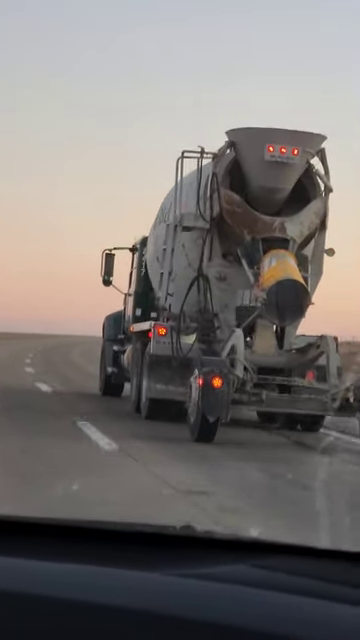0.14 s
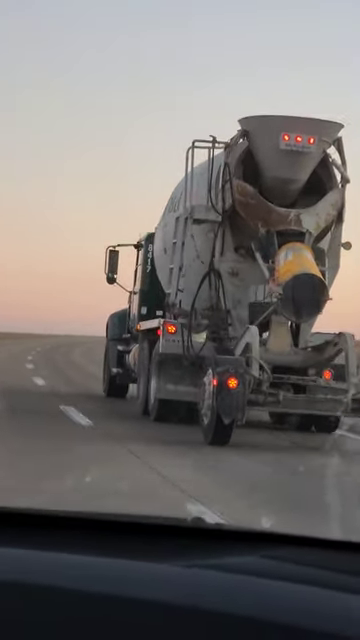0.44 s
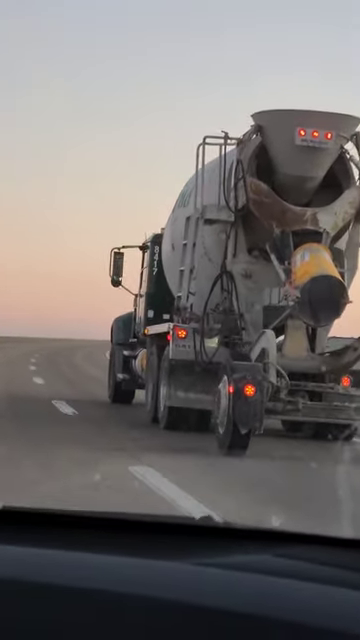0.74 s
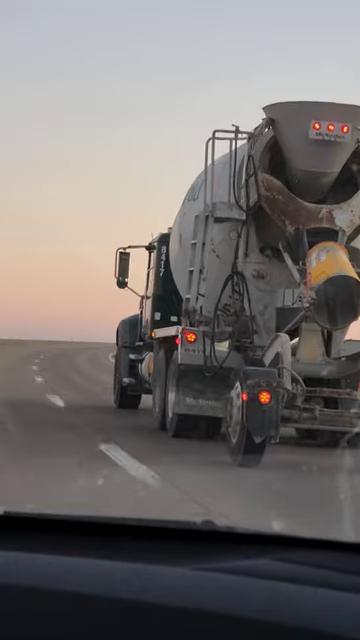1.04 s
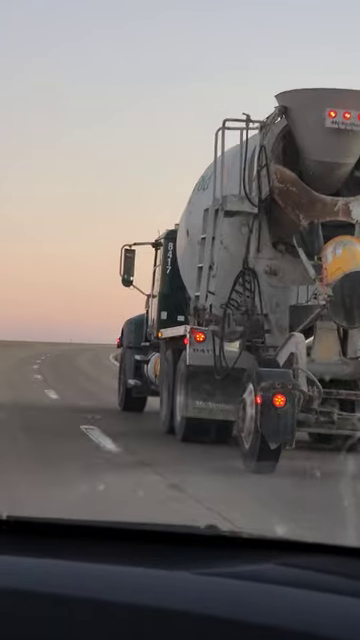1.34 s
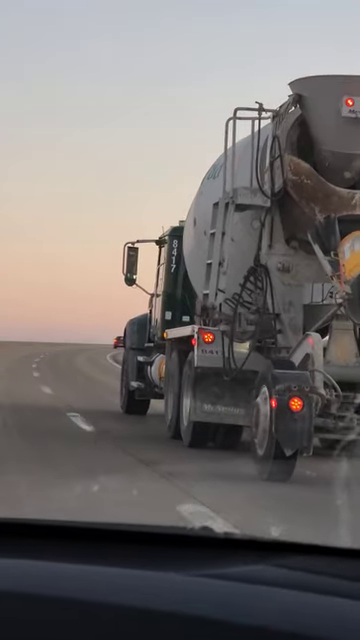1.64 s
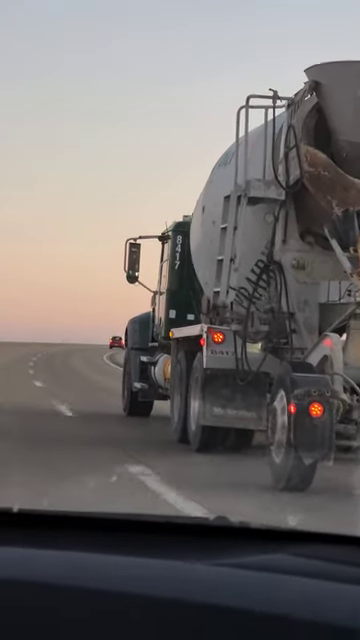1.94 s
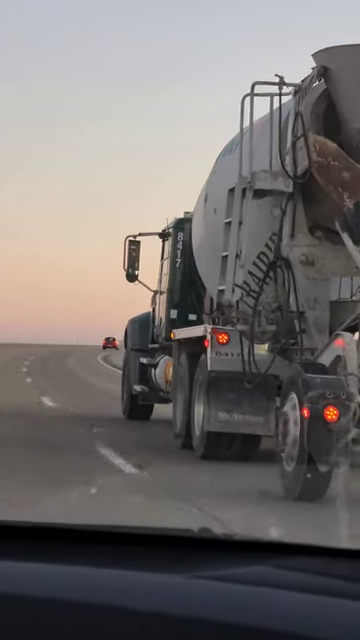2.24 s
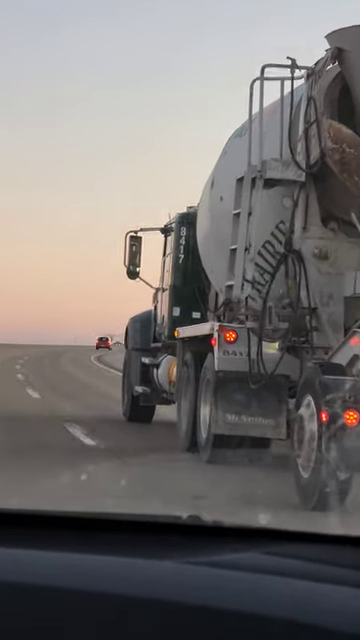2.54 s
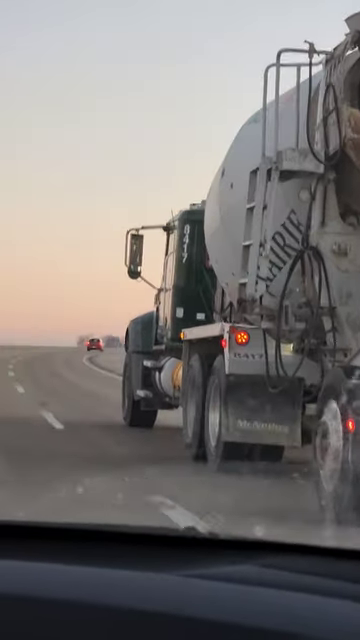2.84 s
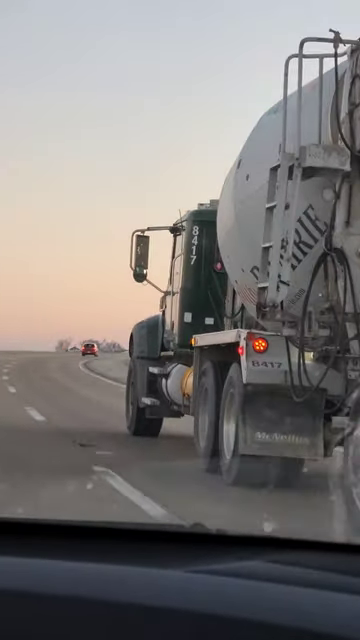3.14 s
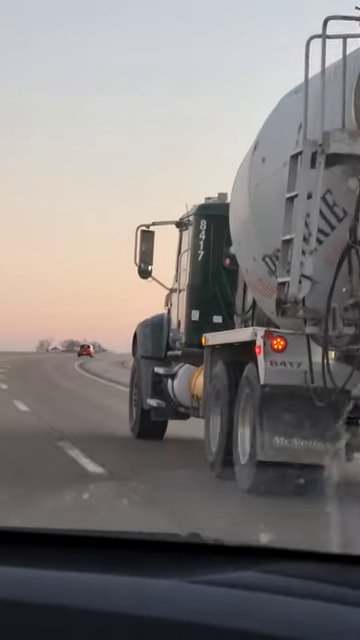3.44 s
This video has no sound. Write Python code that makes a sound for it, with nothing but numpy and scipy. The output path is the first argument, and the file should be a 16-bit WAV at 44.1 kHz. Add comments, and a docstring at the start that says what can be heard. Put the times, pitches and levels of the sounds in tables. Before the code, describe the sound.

Heavy low road rumble surges continuously inside a car at highway speed, with brief bumpy booms, muffled tyre roar, faint engine drone and thin wind; the microphone sits in the cabin.

```python
"""Road rumble fills a car at highway speed: random noise and body resonances, surging in three registers.
Uneven patches of road add booms, made from a low tone with a wandering pitch. Tyres roar and sing in
narrow bands of noise, engines drone faintly as wavering tones, and air rushes past the glass as
shaped noise. A soft hiss swells once and something ticks. A limiter holds down the bass peaks."""
import sys
import numpy as np
from scipy import signal
from scipy.fft import rfft, irfft
from scipy.io import wavfile
from scipy.ndimage import uniform_filter1d, minimum_filter1d

SR = 44100
rng = np.random.default_rng(int(sys.argv[2]) if len(sys.argv) > 2 else 0)


def transcribe(u):
    """Save the signal u as a 16-bit wav file named by the first command-line argument.

    u: samples, shape (n,) or (channels, n), limited to [-1, 1]; the rate is SR.
    q: integer samples, one column per channel.
    """
    v = np.clip(np.atleast_2d(u).T, -1, 1)
    q = np.round(v * 32767).astype(np.int16)
    wavfile.write(sys.argv[1], SR, q)


N = 158319  # length in samples

# Spectrum shapes; only the differences between rows count: (frequency [Hz], density [dB per Hz])
# Air rushing past the glass
AIR_SPECTRUM = [(1500, 1), (3800, -1), (5000, -2.5), (6300, -5.5), (7500, -13.5), (9000, -25), (10500, -25),
                (11700, -18.5), (15000, -24)]
# The soft hiss and the tick
HISS_SPECTRUM = [(3000, -4.5), (6500, 6.5), (8500, -1.5), (10200, -5.5), (11900, 2), (13500, 0.5),
                 (15500, -2.5)]
# Tyre roar through doors and glass
TYRE_SPECTRUM = [(150, -7.5), (400, 3.5), (590, -0.5), (730, -2), (1050, -1), (1200, -2.5), (1450, -0.5),
                 (1580, -7), (1850, -5.5), (2280, -12), (2900, -12.5), (3200, -17), (3700, -18.5),
                 (4100, -23.5), (8000, -56.5)]
# Road rumble in the cabin
RUMBLE_SPECTRUM = [(10, -33), (23, -21.5), (29, 0.5), (45, -3.5), (60, -1), (85, -1), (122, 0), (160, -7.5),
                   (230, -16), (330, -22), (480, -31.5), (800, -45.5), (2000, -66)]

# Level of the hiss, before sway and panning: (time [s], level [dB])
HISS_SWELL = [(1.46, -77), (1.57, -60.5), (1.73, -55.5), (1.89, -55.5), (1.95, -63), (2.15, -74)]
# Level of the tyre roar, before sway: (time [s], level [dB])
TYRE_ROAR_LEVEL = [(0, -30.5), (.8, -29), (2.1, -30.5), (3.6, -29)]

# Swells of single bands, before the depth factor; each band keeps its overall level:
# (time [s], relative level [dB])
# Lower and higher tread noise
LOW_TREAD_SWELL = [(0.0, 2), (0.08, 4.5), (0.28, -7.5), (0.4, -0.5), (0.96, 3), (1.72, -2.0), (1.96, 2),
                   (2.06, 1), (2.44, 3.5), (2.54, -3.0), (2.66, 2.5), (3.22, -1.5), (3.3, 4), (3.5, -2),
                   (3.58, 3)]
HIGH_TREAD_SWELL = [(0.0, 0.0), (0.52, 0), (0.88, 0.5), (1.0, -5), (1.1, 4), (1.381, -2.5), (1.5, 3.5),
                    (1.641, -2.5), (1.84, 3), (1.94, -0.5), (2.821, 0.5), (3.58, 4)]
# Deep, middle and upper rumble, which swell and dip separately
DEEP_SWELL = [(0.0, -1.5), (0.681, 0.0), (0.72, -12), (0.82, -2.5), (1.18, 4), (1.22, -1.5), (1.841, 2.5),
              (1.94, -2), (1.978, 2.0), (2.64, -2), (2.74, 5.5), (2.84, -8), (2.92, 3.0), (3.3, -6),
              (3.32, 0), (3.58, 0)]
MIDDLE_SWELL = [(0.0, 0.5), (0.02, 0.5), (0.26, 1.5), (0.3, -5), (0.46, 2.0), (0.8, -1), (0.84, -0.5),
                (0.979, 4), (1.04, -3.5), (1.08, 4.5), (1.32, -1), (1.358, 1.5), (1.72, 3), (1.88, -4.5),
                (2.08, 3.5), (2.14, -4), (2.28, 1), (2.4, -2.5), (2.46, 2.0), (2.519, -6.5), (2.6, 3),
                (2.92, -1), (2.96, 4), (3.158, -2), (3.22, 6.5), (3.32, -5.0), (3.4, 0), (3.58, 2)]
UPPER_SWELL = [(0.0, -1.5), (0.12, -1.5), (0.18, -5.5), (0.399, -0.5), (0.46, -1), (0.6, 2.0), (0.64, -6),
               (0.72, 3.5), (0.78, -2.5), (0.98, 2.5), (1.54, -0.5), (2.38, 0.5), (2.561, -1.5),
               (2.76, -1.5), (2.8, -4), (3.041, 1.5), (3.141, -3), (3.18, -1), (3.48, 3), (3.58, -1.5)]

# Engine drone tones: (frequency [Hz], level [dB])
ENGINE_TONES = [(101, -29.5), (143, -35), (201, -38)]
# Bands in which the tread sings, before sway and swells:
# (frequency [Hz], width [Hz], level [dB], left-right likeness [-1 to 1])
TREAD_BANDS = [(589, 23, -43.5, 0.49), (915, 59, -45, 0.48), (1044, 24, -46, 0.56), (1113, 17, -44, 0.36),
               (1340, 23, -45.5, 0.43), (1413, 16, -48.5, .3), (1471, 19, -46.5, 0.85),
               (1665, 20, -49, 0.35), (2075, 33, -56, .3), (2593, 35, -54.5, .6), (2800, 70, -59, 0.37),
               (2950, 47, -56.5, 0.54)]
# Resonances of body and cabin air, before sway and swells:
# (frequency [Hz], width [Hz], level [dB], left-right likeness [-1 to 1])
BODY_RESONANCES = [(46.4, 5.9, -18.5, 1), (74.7, 8.5, -22.5, 0.93), (111.4, 17, -21.5, .93),
                   (328, 35, -39, 0.96), (402, 32, -42, 0.68)]
# Uneven patches of road that set the body booming: (start [s], length [s], level [dB])
ROAD_PATCHES = [(0.829, 0.14, -11), (2.031, 0.19, -16), (3.01, 0.072, -11)]

# How alike left and right are: (frequency [Hz], correlation [-1 to 1])
LEFT_RIGHT_LIKENESS = [(30, 0.95), (190, 0.98), (330, 0.65), (550, 0.54), (1050, 0.24), (1250, 0.23),
                       (2100, 0.00033), (2700, 0.5), (3600, 0.26), (4500, -.1), (6000, 0)]
# Left minus right in the cabin: (frequency [Hz], level difference [dB])
CABIN_BALANCE = [(100, -0.7), (450, -0.1), (1000, -1.5), (1600, 0), (2200, 0.9), (3600, .5), (4400, -4),
                 (6100, -5), (7800, 2)]

AIR_DB, RUMBLE_DB = -50.5, -10.5  # before sway
RUMBLE_SWAY_DB = 1.2
HISS_PAN_DB = 2.5  # left minus right
TICK_S, TICK_DB, TICK_ATTACK_S, TICK_DECAY_S = 3.038, -55, .004, .013
ENGINE_DRIFT, TREAD_DRIFT, BODY_DRIFT = .01, .008, .008  # spread of the pitch, as a share
LOW_TREAD_HZ, HIGH_TREAD_HZ = (800, 1230), (1230, 1650)
DEEP_HZ, MIDDLE_HZ, UPPER_HZ = (10, 60), (60, 140), (140, 280)
SURGE_WINDOW_S = 0.076  # averaging window for evening out chance surges
PATCH_HZ, PATCH_WIDTH_HZ, PATCH_ATTACK_S, PATCH_RELEASE_S = 45.6, 12, 0.015, 0.033
CEILING, LIMIT_HOLD_S, LIMIT_BELOW_HZ = .94, .012, 400
TOP_HZ = 15500


def undb(db):
    """Turn decibels into gain."""
    return 10 ** (np.asarray(db) / 20)


def curve(rows):
    """Join the points of a (time, value) table with straight lines."""
    return np.interp(np.arange(N) / SR, *np.array(rows).T)


def bins():
    """Frequency of each spectral line, at least 1 Hz."""
    return np.maximum(np.fft.rfftfreq(N, 1 / SR), 1)


def over_hz(rows):
    """Read a (frequency, value) table on a log-frequency axis."""
    hz, value = np.array(rows).T
    return np.interp(np.log(bins()), np.log(hz), value)


def colour(rows):
    """Gain of a (frequency, dB) table, falling away above its last point."""
    fall = np.maximum(bins() / rows[-1][0], 1) ** 2
    return undb(over_hz(rows)) / fall


def resonance(hz, width_hz):
    """Gain of a resonance: strongest at one frequency, with steep skirts."""
    distance = (bins() ** 2 - hz ** 2) / (bins() * width_hz)
    return 1 / (1 + distance ** 2 / 2)


def below(hz):
    """Gain of a steep low-pass."""
    return 1 / (1 + (bins() / hz) ** 8)


def noise(gain, likeness):
    """Stereo noise of rms 1 with the given spectrum and left-right correlation."""
    c = np.clip(likeness, -1, 1)
    mid, side = rfft(rng.standard_normal((2, N))) * gain
    mid = mid * np.sqrt(1 + c)
    side = side * np.sqrt(1 - c)
    x = irfft(np.array([mid + side, mid - side]), N)
    return x / x.std()


def walk(rate):
    """Smooth random motion with a spread of 1; a higher rate in Hz moves faster."""
    smooth = np.exp(-(bins() / max(rate, 1)) ** 2)
    x = irfft(rfft(rng.standard_normal(N)) * smooth, N)
    return (x - x.mean()) / x.std()


def pan(db):
    """Left and right gains for a left-minus-right level."""
    return undb(np.array([[db], [-db]]) / 2)


def waver(x, share, rate):
    """Let the pitch of a stereo sound wander by reading it a little faster or slower."""
    n = np.arange(N)
    place = n + share * np.cumsum(walk(rate))
    return np.array([np.interp(place % (N - 1), n, side) for side in x])


def ringing(table, sway_db, drift):
    """Resonances shaken at random, each swaying in level and wandering in pitch."""
    out = 0
    for hz, width, db, likeness in table:
        ring = waver(noise(resonance(hz, width), likeness), drift, 5.56)
        out = out + ring * undb(db + sway_db * walk(2.5))
    return out


def swell(x, band_hz, rows, depth, evenness):
    """One band of a noise swells along a level curve; its own chance surges are partly evened out."""
    low, high = band_hz
    band = irfft(rfft(x) * (below(high) - below(low)), N)
    size = int(SURGE_WINDOW_S * SR)
    power = uniform_filter1d(uniform_filter1d((band ** 2).mean(axis=0), size), size)
    evened = band / power ** (np.clip(evenness, 0, 1) / 2)
    shaped = evened * undb(depth * curve(rows))
    return x - band + shaped * band.std() / shaped.std()  # the band keeps its overall level


def hiss():
    """High, thin noise that swells and fades, a little louder on the left."""
    level = undb(curve(HISS_SWELL) + .8 * walk(12))
    return noise(colour(HISS_SPECTRUM), 0) * level * pan(HISS_PAN_DB)


def tick():
    """One light tick: a burst of thin noise with a quick rise and a short tail."""
    t = np.arange(N) / SR - TICK_S
    rise = np.minimum(t, 0) / TICK_ATTACK_S
    tail = np.maximum(t, 0) / TICK_DECAY_S
    return noise(colour(HISS_SPECTRUM), 0) * undb(TICK_DB) * np.exp(rise - tail)


def air():
    """Air rushes past the glass as broad noise with a slight sway in level."""
    rush = noise(colour(AIR_SPECTRUM), over_hz(LEFT_RIGHT_LIKENESS))
    return rush * undb(AIR_DB + 0.56 * walk(7.3))


def engines():
    """Engine tones half buried in the rumble; their pitches waver together."""
    speed = 1 + ENGINE_DRIFT * walk(2.4)
    seconds = np.cumsum(speed) / SR  # time stretched by the speed
    out = 0
    for hz, db in ENGINE_TONES:
        turns = hz * seconds + rng.random()
        out = out + np.sqrt(2) * undb(db) * np.sin(2 * np.pi * turns)
    return out


def tyres():
    """Broad tyre roar with the wavering bands of the tread, which come and go in patches."""
    db = curve(TYRE_ROAR_LEVEL)
    roar = noise(colour(TYRE_SPECTRUM), over_hz(LEFT_RIGHT_LIKENESS)) * undb(db + 0.75 * walk(14))
    singing = ringing(TREAD_BANDS, sway_db=2.5, drift=TREAD_DRIFT) * undb(db - db.mean())
    out = roar + singing
    out = swell(out, LOW_TREAD_HZ, LOW_TREAD_SWELL, depth=1.15, evenness=.6)
    return swell(out, HIGH_TREAD_HZ, HIGH_TREAD_SWELL, depth=1.1, evenness=.6)


def patch_booms():
    """Uneven patches push the body, which booms as a low tone with a wandering pitch."""
    t = np.arange(N) / SR
    push = 0
    for start, length, db in ROAD_PATCHES:
        rise = np.clip((t - start) / PATCH_ATTACK_S, 0, 1)
        fade = np.exp(-np.maximum(t - start - length, 0) / PATCH_RELEASE_S)
        push = push + undb(db) * rise * fade
    hz = PATCH_HZ + PATCH_WIDTH_HZ / 2 * walk(12)
    return push * np.sqrt(2) * np.sin(2 * np.pi * np.cumsum(hz) / SR)


def road():
    """Road texture shakes the body; the rumble swells and dips in three registers, with added booms."""
    rumble = noise(colour(RUMBLE_SPECTRUM), over_hz(LEFT_RIGHT_LIKENESS))
    rumble = rumble * undb(RUMBLE_DB + RUMBLE_SWAY_DB * walk(20))
    out = rumble + ringing(BODY_RESONANCES, sway_db=1.1, drift=BODY_DRIFT)
    out = swell(out, DEEP_HZ, DEEP_SWELL, depth=1.2, evenness=.5)
    out = swell(out, MIDDLE_HZ, MIDDLE_SWELL, depth=1.4, evenness=.75)
    out = swell(out, UPPER_HZ, UPPER_SWELL, depth=1.35, evenness=.65)
    return out + patch_booms()


def scene():
    """Everything heard in the cabin; the balance acts on all but the hiss and the tick."""
    cabin = air() + engines() + tyres() + road()
    balance = undb(np.outer([1, -1], over_hz(CABIN_BALANCE)) / 2)
    return irfft(rfft(cabin) * balance, N) + hiss() + tick()


def record(dry):
    """A look-ahead limiter turns down the bass around loud peaks; the top is cut."""
    size = int(LIMIT_HOLD_S * SR / 2)
    bass_filter = signal.butter(2, LIMIT_BELOW_HZ, fs=SR, output="sos")
    bass = signal.sosfiltfilt(bass_filter, dry)
    peak = np.abs(dry).max(axis=0)
    gain = minimum_filter1d(CEILING / np.maximum(peak, CEILING), 2 * size + 1)
    gain = uniform_filter1d(uniform_filter1d(gain, size), size)
    limited = dry - bass * (1 - gain)
    top_cut = signal.ellip(8, .2, 70, TOP_HZ, fs=SR, output="sos")
    return signal.sosfilt(top_cut, limited)


dry = scene()
out = record(dry)
transcribe(out)
```